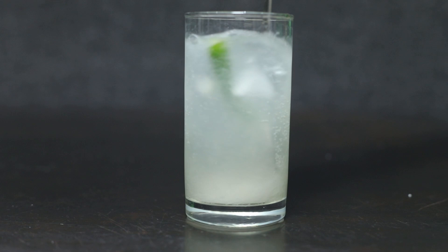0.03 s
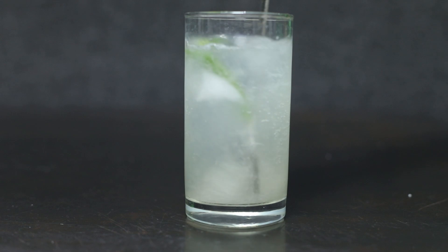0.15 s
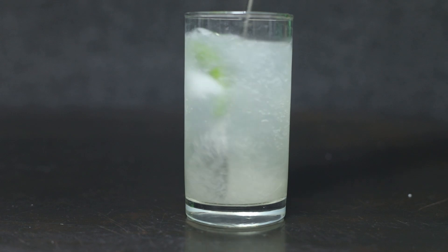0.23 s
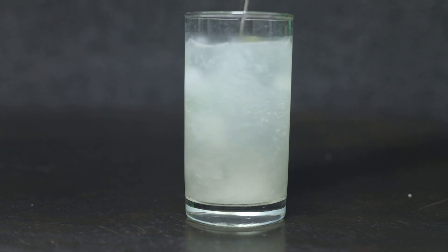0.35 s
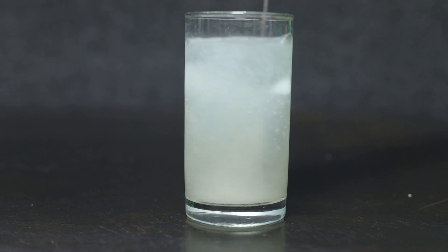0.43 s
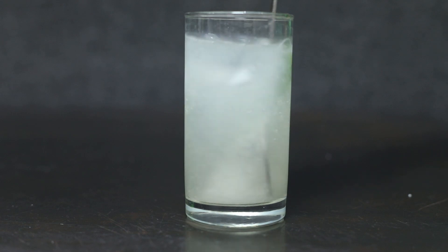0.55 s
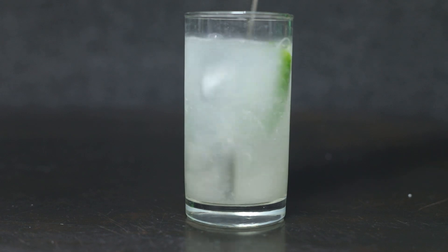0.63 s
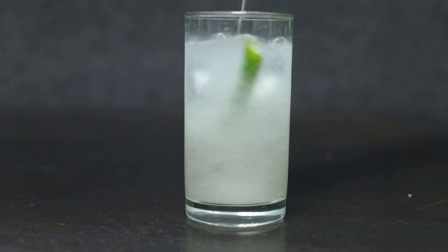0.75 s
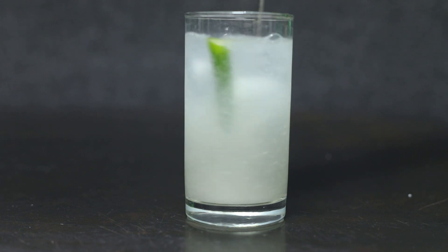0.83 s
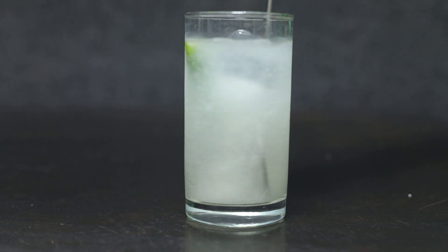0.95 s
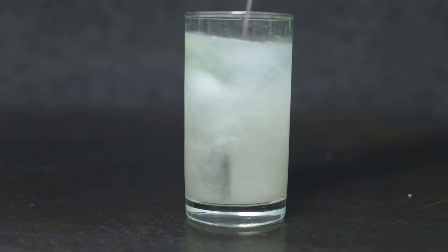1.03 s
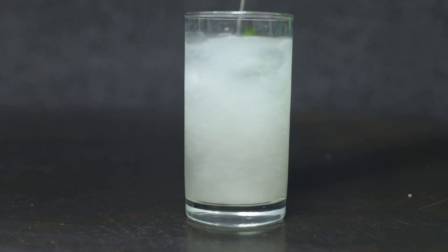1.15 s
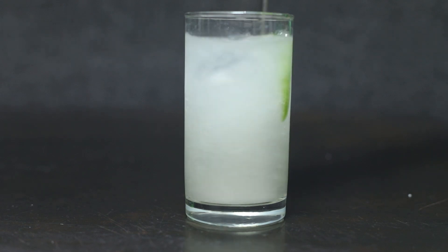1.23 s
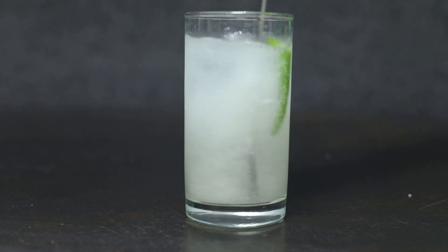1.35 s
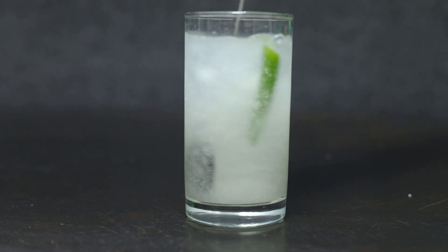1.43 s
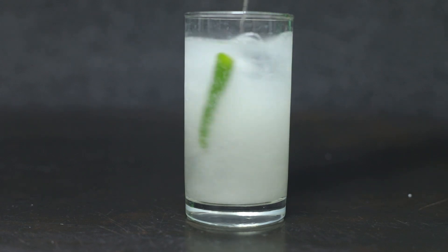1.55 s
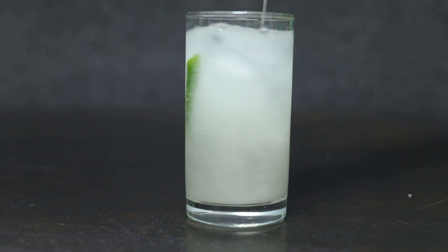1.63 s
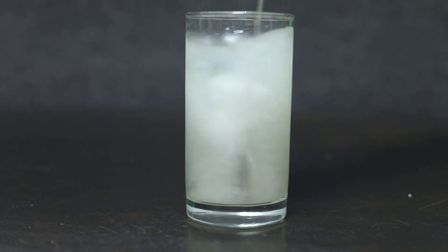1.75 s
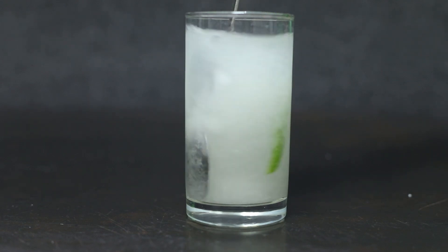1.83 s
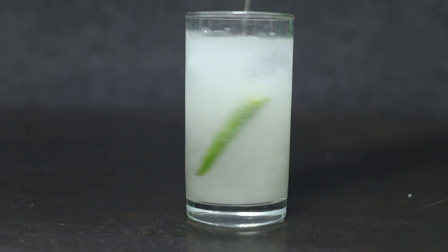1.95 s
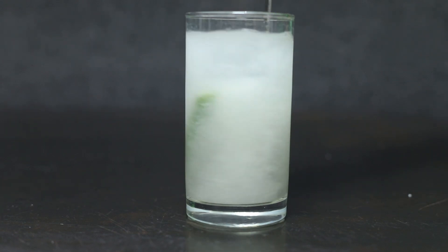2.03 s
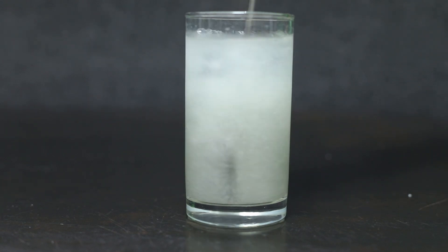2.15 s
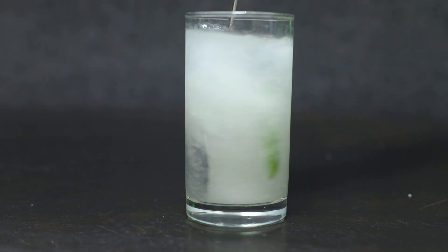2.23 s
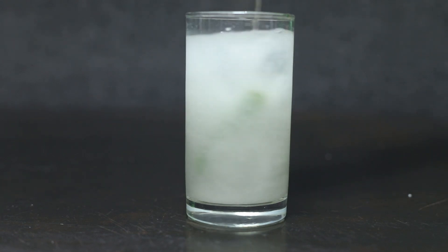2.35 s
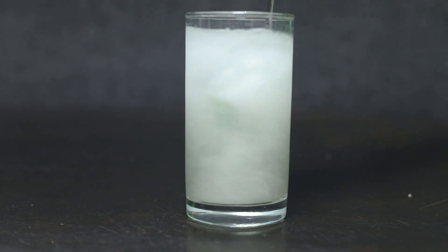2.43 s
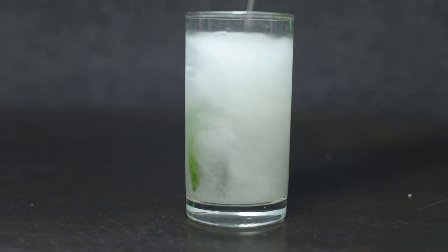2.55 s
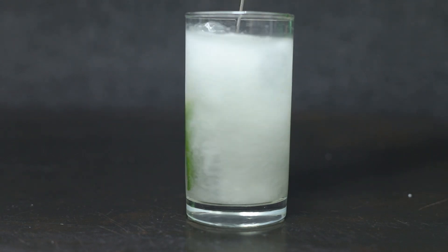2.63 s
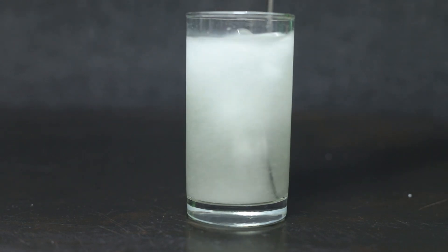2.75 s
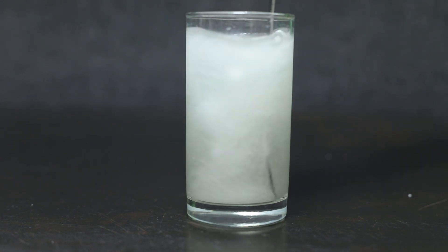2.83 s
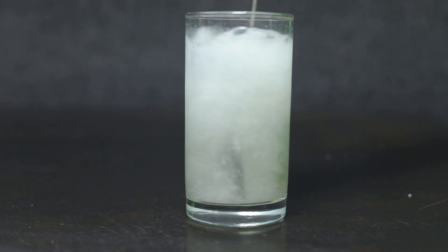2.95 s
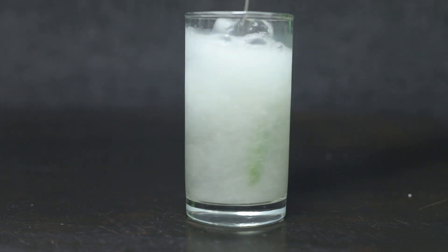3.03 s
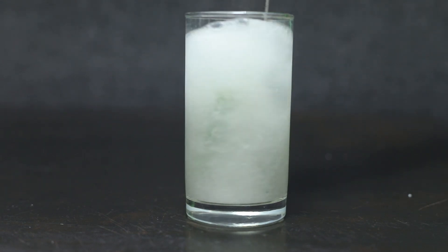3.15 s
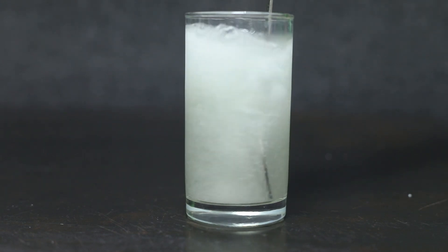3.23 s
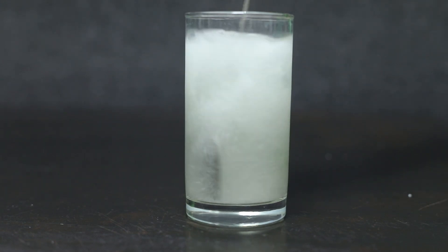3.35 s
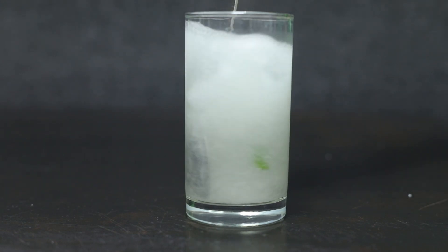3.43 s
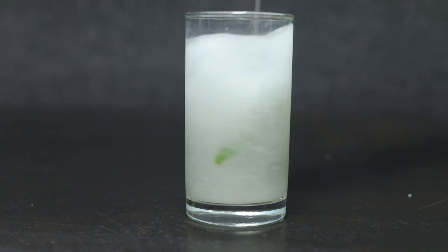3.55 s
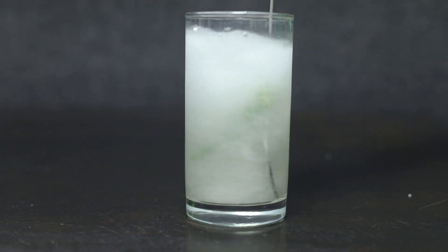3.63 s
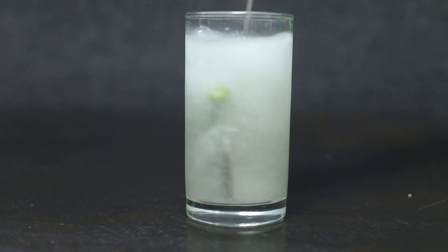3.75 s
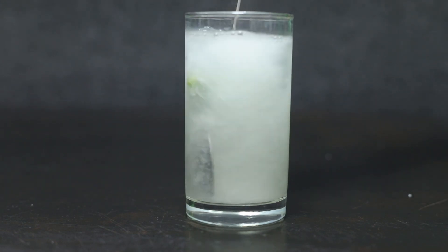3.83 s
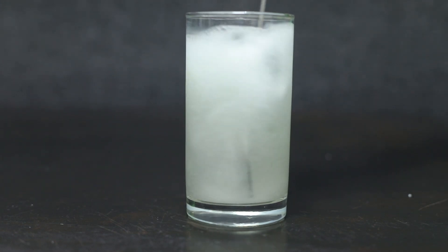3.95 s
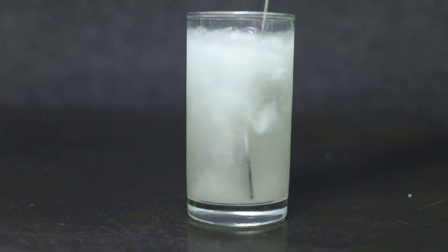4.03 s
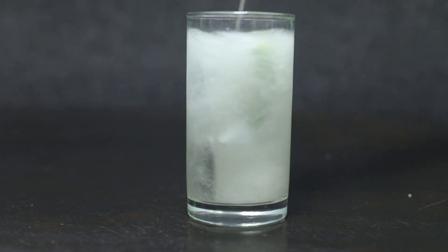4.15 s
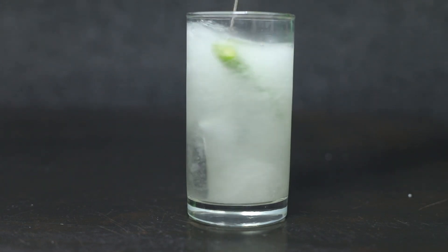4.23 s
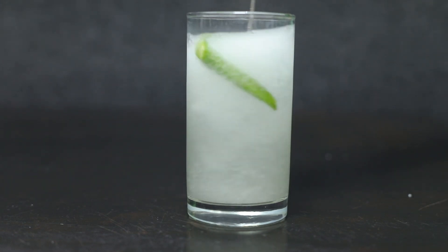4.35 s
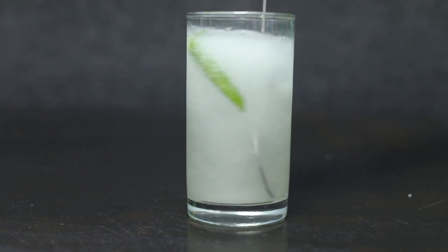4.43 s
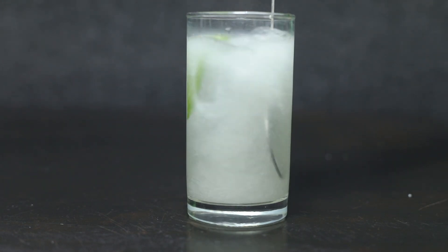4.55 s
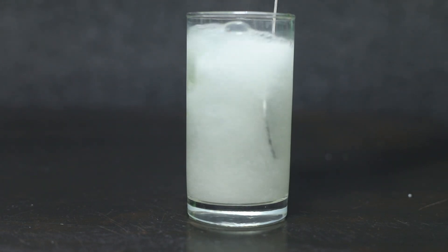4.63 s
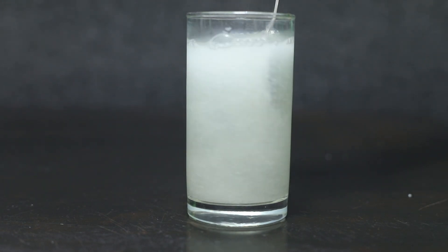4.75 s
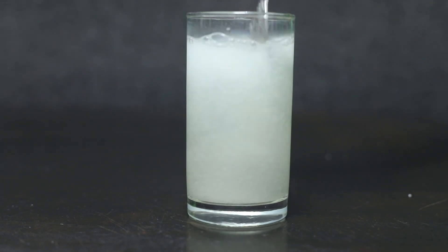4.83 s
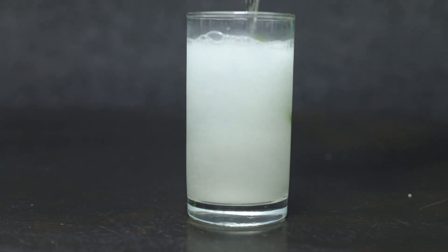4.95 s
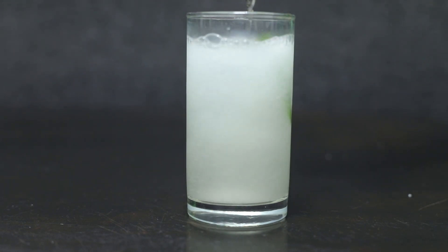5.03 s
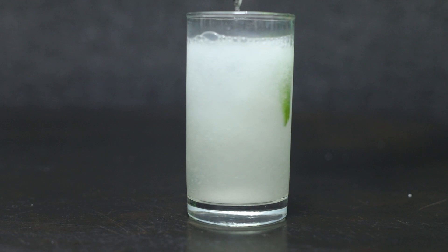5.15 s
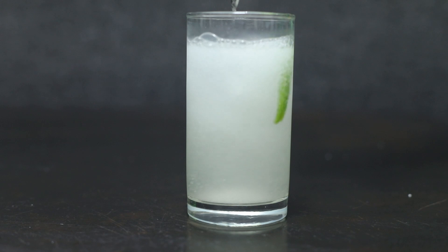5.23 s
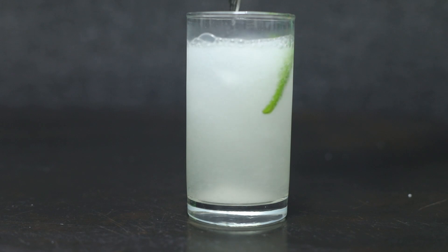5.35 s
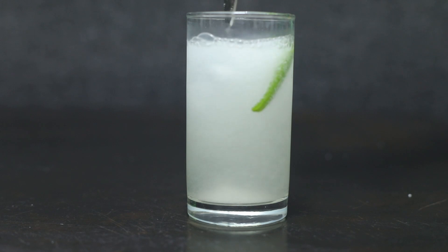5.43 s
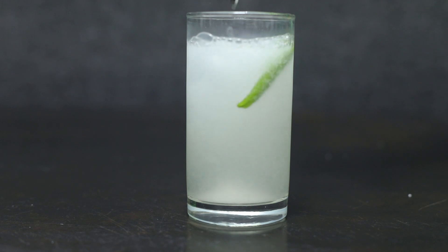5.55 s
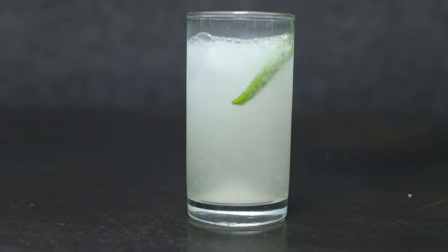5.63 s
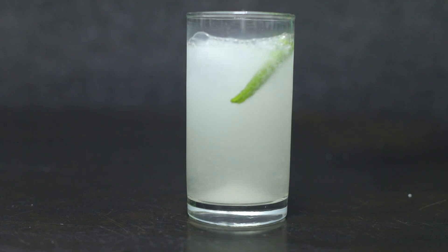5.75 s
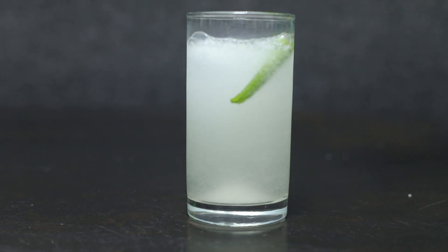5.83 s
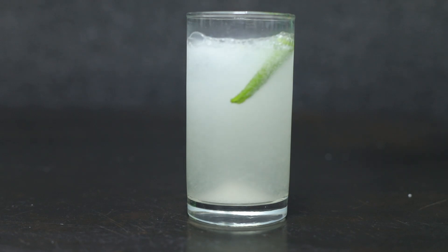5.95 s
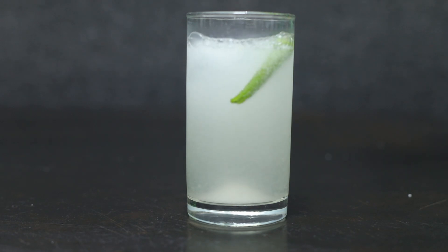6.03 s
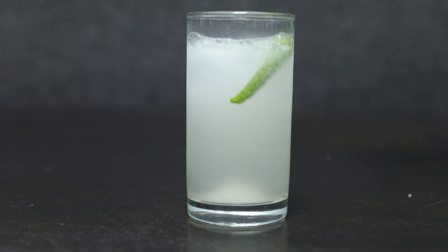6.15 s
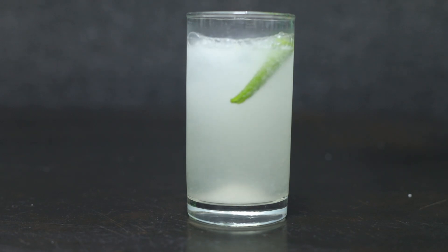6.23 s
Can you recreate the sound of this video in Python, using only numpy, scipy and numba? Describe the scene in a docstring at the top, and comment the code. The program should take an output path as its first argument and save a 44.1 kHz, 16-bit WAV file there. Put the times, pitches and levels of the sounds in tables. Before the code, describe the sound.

A metal spoon stirs ice in a tall full glass, quick irregular dull clinks over watery gulps and soft fizz, then it settles quietly.

```python
"""A metal spoon stirs ice in a tall glass of fizzy drink on a table, in a small quiet room.
Each knock is a short dull clink, since foam damps the glass: brief decaying modes of wall, ice and spoon.
The drink gulps and bubbles round the spoon: swelling, fading sines that climb in pitch.
Fizz hisses at the surface as uneven band-passed noise; an appliance hums far off as wavering sines."""
import sys
import numpy as np
from scipy import signal
from scipy.fft import rfft, irfft
from scipy.io import wavfile
from scipy.ndimage import uniform_filter1d
from numba import njit

SR = 44100
rng = np.random.default_rng(int(sys.argv[2]) if len(sys.argv) > 2 else 0)


def store_pcm(level_fs):
    """Save levels as 16-bit WAV."""
    pcm = np.round(np.clip(level_fs, -1, 1) * 32767).astype(np.int16)
    wavfile.write(sys.argv[1], SR, np.atleast_2d(pcm).T)


N = 277389
T = np.arange(N) / SR

# modes of the glass wall: [f/Hz, relative level/dB, t60/s]
WALL_MODES = [(1910, 3.5, 0.006), (2091, 3.5, 0.009), (2235, 7, 0.005), (2431, 3.5, 0.013), (2530, 2, 0.01),
              (2700, 2.5, 0.008), (3010, -4, 0.005)]
# modes of the ice cubes: [f/Hz, relative level/dB, t60/s]
ICE_MODES = [(900, -11, 0.005), (1147, -1, 0.009), (1340, -2, 0.007), (1510, 2, 0.01), (1716, 1, 0.007),
             (1850, 2, 0.006)]
# motion of the drink and its gas: [t/s, churning drive/dB, fizz level/dB]
DRINK_LEVELS = [(0, -56.5, -66), (.21, -57.5, -74), (.5, -64.5, -70.5), (1.21, -57.5, -72.5),
                (1.5, -55, -71), (1.7, -59, -70.5), (1.94, -59, -68), (2.33, -54, -70), (2.7, -62.5, -68),
                (3.05, -51, -62.5), (3.28, -61, -65), (3.84, -61.5, -65), (4.36, -55.5, -65),
                (4.66, -69.5, -65.5), (5.3, -76, -68.5), (6.29, -73, -69)]


def undb(db):
    """Decibels to gain."""
    return 10 ** (np.asarray(db, float) / 20)


def unit(x):
    """Scale to rms 1."""
    return x / np.sqrt(np.mean(x ** 2))


def band(x, hz, width_hz):
    """Two-pole band-pass."""
    return signal.lfilter(*signal.iirpeak(hz, hz / width_hz, SR), x)


def highpass(x, order, hz):
    """Butterworth high-pass."""
    return signal.sosfilt(signal.butter(order, hz, "high", fs=SR, output="sos"), x)


def walk(rate_hz):
    """Random levels held 1 / rate_hz and slewed twice; rms 1."""
    hold = int(SR / rate_hz)
    steps = np.repeat(rng.standard_normal(N // hold + 1), hold)
    slewed = uniform_filter1d(uniform_filter1d(steps, hold), hold)
    return unit(slewed[:N])


def ring(s, db, modes, scatter_db, detune, rise_s, spot_hz=None):
    """Every blow starts each mode with its own strength, a little off pitch as ice and foam shift."""
    out = np.zeros(N + SR)
    at = (s * SR).astype(int)
    chance = rng.standard_normal((len(s), len(modes), 3, 1))
    for k, (hz, mode_db, t60_s) in enumerate(modes):
        n = np.arange(int(t60_s * SR))
        # modes far from the favoured pitch are barely driven: 24 dB down per octave
        far_db = 0 if spot_hz is None else 24 * np.abs(np.log2(hz / spot_hz))
        gain = undb((db - far_db)[:, None] + mode_db + scatter_db * chance[:, k, 0])
        mode_hz = hz * (1 + detune * chance[:, k, 1])
        phase = 2 * np.pi * mode_hz * n / SR + 1.1 * chance[:, k, 2]
        shape = undb(-60 * n / len(n)) * (1 - np.exp(-n / (rise_s * SR))) ** 2
        np.add.at(out, at[:, None] + n, gain * shape * np.sin(phase))
    return out[:N]


@njit
def bubbles(n, at, step, cycles, glide, size):
    """Each bubble swells and fades (crest at its time) while its pitch climbs; step is rad/sample."""
    out = np.zeros(n)
    for k in range(len(at)):
        tau = cycles * 2 * np.pi / step[k]  # samples from onset to crest
        phase = 0.
        for i in range(int(8 * tau)):
            j = at[k] - int(tau) + i
            phase += step[k] * (1 + glide * (i / tau - 1))
            if 0 <= j < n:
                out[j] += size[k] * i / tau * np.exp(1 - i / tau) * np.sin(phase)
    return out


def bubbles_at(s, hz, cycles, glide, gain):
    """Bubbles given by crest time in s and pitch at the crest in Hz."""
    return bubbles(N, (s * SR).astype(np.int64), 2 * np.pi * hz / SR, cycles, glide, gain)


def swarm(lo_hz, hi_hz, cycles, glide, spread_db, count):
    """A random crowd of bubbles of mixed size; rms 1."""
    when, pitch, size = rng.random((count, 3)).T
    hz = lo_hz * (hi_hz / lo_hz) ** pitch
    return unit(bubbles_at(when * N / SR, hz, cycles, glide, undb(spread_db * size)))


def vessel(x):
    """The full glass colours what moves inside it: resonances added to the direct sound."""
    # resonances of the full glass: [f/Hz, width/Hz, level/dB]
    resonances = [(524, 40, 0), (653, 40, 1), (854, 45, 2), (1101, 40, 6), (1501, 60, 2)]
    x = highpass(x, 3, 300)  # too small for bass
    return x + sum(undb(db) * band(x, hz, width_hz) for hz, width_hz, db in resonances)


def drink():
    """Fizz at the surface, small bubbles in the swirl, a low slosh; the last two surge together."""
    # bands of the fizz: [f/Hz, width of each of two passes/Hz, relative level/dB]
    fizz_bands = [(4160, 1400, 11), (5700, 680, 10), (7300, 1400, 15), (9740, 3100, 15.5),
                  (10400, 3000, 7.5), (10100, 9000, 12.5)]
    s, *columns = np.transpose(DRINK_LEVELS)
    churn_db, fizz_db = (np.interp(T, s, c) for c in columns)

    pop_gain = undb(2.5 * np.minimum(rng.exponential(size=N), 7))  # some samples stand far out
    fizz = 0
    for hz, width_hz, db in fizz_bands:
        hiss = pop_gain * rng.standard_normal(N)
        fizz = fizz + undb(db) * band(band(hiss, hz, width_hz), hz, width_hz)
    fizz_gain = undb(fizz_db + 1.2 * walk(3.77))

    surge = walk(23.08)
    swirl = undb(1.8 * surge) * swarm(650, 3000, cycles=1.5, glide=.03, spread_db=20, count=4000)
    slosh = undb(3 + 5 * surge) * swarm(330, 1500, cycles=1.1, glide=.03, spread_db=16, count=3000)
    churning = vessel(undb(churn_db - 7) * (swirl + slosh))
    return fizz_gain * unit(fizz) + churning


def background():
    """Still air of the room as shaped noise, and a motor hum that wavers a little in pitch and level."""
    # spectrum of the room air: [f/Hz, density/dB per Hz]
    air_spectrum = [(30, -112), (110, -117), (150, -104), (200, -99), (300, -102), (420, -102.5),
                    (900, -100), (1700, -103), (2500, -105), (3300, -114), (5300, -119), (16000, -130)]
    # partials of the hum: [f/Hz, mean rms level/dB]
    hum_partials = [(175, -79), (350, -76), (395, -81), (445, -81), (525, -79.5), (642, -79), (691, -80)]
    hz, density_db = np.transpose(air_spectrum)
    f = np.maximum(np.fft.rfftfreq(N, 1 / SR), 1)
    shape = undb(np.interp(np.log(f), np.log(hz), density_db))
    air = irfft(rfft(rng.standard_normal(N)) * shape, N) * np.sqrt(SR / 2)

    warped_s = np.cumsum(1 + 0.00295 * walk(2.8)) / SR
    hum = 0
    for partial_hz, db in hum_partials:
        gain = np.sqrt(2) * undb(db + 2 * walk(15))
        hum = hum + gain * np.sin(2 * np.pi * partial_hz * warped_s)
    return air + hum


def rattle(count=400):
    """Drifting cubes bump each other and the wall at random, harder while the drink churns."""
    settled_s, top_db, spread_db = 5.1, 4, 12  # last bump; strength against the churning drive
    c = rng.random((count, 3)).T
    s = c[0] * settled_s
    at_s, churn_db = np.transpose(DRINK_LEVELS)[:2]
    wall_db, ice_db = np.interp(s, at_s, churn_db) + top_db - spread_db * c[1:]
    wall = ring(s, wall_db, WALL_MODES, scatter_db=6, detune=0.047, rise_s=0.00052)
    ice = ring(s, ice_db, ICE_MODES, scatter_db=3, detune=0.06, rise_s=0.0004)
    return wall + ice


def knocks():
    """Spoon and ice against the glass and each other; the wall passes each blow to the table top."""
    # knocks: [t/s, wall drive/dB, wall pitch favoured by the struck spot/Hz,
    #          ice drive/dB, spoon stem drive/dB, spoon bowl drive/dB, contact tick drive/dB]
    blows = [(0.0098, -37.5, 2200, -40, -44, -45, -30), (0.018, -32.5, 2100, -28, -36.5, -42, -48),
             (0.038, -32.5, 2230, -34.5, -51, -36, -29), (0.0514, -28.5, 2110, -60, -37, -27.5, -44),
             (0.059, -41, 2430, -41, -53, -34.5, -63), (0.186, -56, 2500, -69, -65, -66, -70),
             (0.225, -67, 2300, -50, -69, -68, -63), (0.2464, -63, 2600, -49, -65, -56, -47),
             (0.3084, -48, 2250, -44, -43, -49, -44), (0.323, -44, 2300, -53, -70, -70, -72),
             (0.331, -46, 2500, -43, -73, -67, -71), (0.346, -46, 2500, -63, -75, -72, -73),
             (0.3597, -31.5, 2270, -30, -42, -42.5, -44), (0.369, -41, 1950, -67, -62, -76, -76),
             (0.437, -38, 1980, -36, -50.5, -68, -72), (0.501, -58, 2490, -67, -60, -62, -62),
             (0.5363, -34.5, 2130, -34, -44, -49, -57), (0.6404, -37, 2450, -38, -46, -46, -47),
             (0.6629, -41.5, 2040, -27.5, -43, -36, -43), (0.667, -35.5, 2370, -52, -42, -56, -74),
             (0.721, -38, 2620, -44, -67, -55, -71), (0.7408, -30, 1990, -33, -35, -39, -32),
             (0.7886, -36, 2290, -31, -46, -42, -34), (0.831, -46.5, 2440, -36, -53, -56, -49),
             (0.856, -44, 2030, -49, -53, -66, -45), (0.894, -51, 2290, -49, -49, -64, -57),
             (0.964, -45, 2290, -37.5, -39.5, -61, -66), (0.9718, -40, 2620, -51, -56, -42.5, -42.5),
             (0.989, -41, 2650, -38.5, -51, -69, -86), (1.06, -38, 2180, -31, -45, -36, -35.5),
             (1.064, -50, 2330, -33, -49, -66, -71), (1.075, -58, 2460, -34.5, -65, -54, -65),
             (1.1366, -39, 2260, -41, -47, -47, -49), (1.15, -45, 2430, -40, -41, -67, -49),
             (1.163, -36, 2270, -29.5, -36.5, -32.5, -33.5), (1.176, -35.5, 2520, -43, -45, -51, -42),
             (1.186, -40, 2450, -43, -62, -59, -48), (1.2523, -68, 2410, -39, -56, -65, -56),
             (1.301, -48.5, 2400, -57, -48, -69, -74), (1.344, -62, 2360, -52, -57, -70, -72),
             (1.3841, -70, 2400, -44, -64, -74, -74), (1.4278, -46, 2540, -39, -54, -53, -47),
             (1.438, -47.5, 2430, -53, -69, -75, -81), (1.4546, -42.5, 2430, -34, -44, -69, -37),
             (1.534, -31.5, 2370, -40, -33, -37, -32), (1.5512, -38, 2740, -51, -46, -39.5, -41),
             (1.585, -45, 2570, -47, -68, -68, -64), (1.6133, -25, 3100, -37.5, -32.5, -35, -26.5),
             (1.6284, -38, 2430, -44, -27.5, -28, -25), (1.6419, -30.5, 1990, -39, -36, -58, -76),
             (1.7329, -33, 2480, -40, -37.5, -44.5, -37.5), (1.8215, -55, 2280, -44, -55, -43, -37),
             (1.8353, -37, 2300, -36, -49, -53, -44), (1.8911, -38.5, 2560, -34, -39, -39, -38.5),
             (1.8997, -42.5, 2600, -42, -40.5, -39.5, -49), (1.9902, -65, 2300, -44, -52, -51, -70),
             (2.054, -70, 2010, -40, -80, -85, -73), (2.0916, -34.5, 1860, -52, -37.5, -35.5, -43),
             (2.1134, -55, 2900, -64, -54, -59, -48), (2.137, -40.5, 2340, -70, -66, -62, -68),
             (2.154, -46, 2200, -60, -70, -70, -72), (2.194, -55, 2130, -68, -72, -57, -51),
             (2.2057, -37.5, 2170, -56, -51, -55, -44), (2.209, -36.5, 2270, -30.5, -36.5, -37.5, -37.5),
             (2.246, -50, 2360, -48, -71, -60, -67), (2.2753, -29, 2230, -32.5, -31.5, -34.5, -26),
             (2.32, -45, 2510, -63, -76, -65, -52), (2.356, -48, 2800, -60, -64, -56, -64),
             (2.385, -45, 2070, -45.5, -74, -77, -66), (2.407, -44, 2110, -42, -57, -45.5, -47),
             (2.418, -36, 2530, -33, -35, -44, -34), (2.427, -37, 2170, -47, -37.5, -37.5, -36),
             (2.498, -43, 2400, -35.5, -47, -71, -44), (2.5576, -39.5, 2660, -59, -51, -59, -66),
             (2.6081, -41, 2530, -46, -58, -72, -73), (2.646, -45, 2300, -46, -54, -59, -50),
             (2.72, -32.5, 2230, -40, -34, -35.5, -51), (2.73, -24, 2240, -27.5, -26, -34, -22.5),
             (2.806, -38, 2380, -34, -35, -39.5, -39), (2.8587, -52, 2430, -34, -63, -68, -71),
             (2.8698, -31, 2000, -30, -48, -63, -74), (2.881, -40, 2380, -66, -36.5, -44, -40),
             (2.9287, -47, 2140, -58, -63, -49, -43), (2.9504, -39, 2150, -49, -52, -70, -70),
             (2.9594, -25, 2300, -51, -33.5, -38, -25), (2.9765, -23.5, 2130, -30, -24.5, -25.5, -23.5),
             (2.9804, -28, 2190, -62, -30, -48, -44), (2.9887, -54, 2160, -39, -47, -33.5, -51),
             (3.004, -47, 2300, -45, -54, -56, -58), (3.031, -42, 2200, -56, -45, -56, -60),
             (3.0594, -37, 2410, -55, -49, -38, -70), (3.066, -36, 2570, -40, -50, -49, -44),
             (3.0812, -33, 2500, -57, -40, -43.5, -35), (3.085, -36, 2340, -50, -35, -47, -53),
             (3.0972, -28, 2350, -26.5, -34, -27.5, -20), (3.129, -32, 2700, -60, -29, -34, -37),
             (3.1383, -35.5, 2520, -48, -54, -41, -36), (3.1738, -29.5, 2500, -61, -40, -59, -66),
             (3.194, -40.5, 2320, -36, -45, -58, -62), (3.2171, -45, 2470, -69, -44, -49, -48),
             (3.3209, -39.5, 2350, -36, -49, -72, -65), (3.3383, -33, 2140, -34, -43, -35, -44),
             (3.3457, -47, 2220, -35, -57, -41, -65), (3.4687, -29.5, 2150, -40, -39.5, -34, -32),
             (3.6124, -35, 2090, -35.5, -37, -34.5, -55), (3.71, -51, 2380, -47, -58, -75, -67),
             (3.782, -61, 2390, -41, -68, -70, -64), (3.7974, -36, 2200, -32, -39, -39, -34.5),
             (3.804, -37.5, 2270, -44, -50, -43, -48), (3.807, -42, 2460, -33, -67, -63, -44),
             (3.8646, -38, 2300, -36, -27, -32, -37), (3.879, -21, 2370, -34, -27, -30.5, -26),
             (3.8868, -30.5, 2450, -59, -56, -52, -49), (3.9, -37, 2460, -68, -47, -57, -41),
             (3.918, -46, 2500, -64, -56, -65, -60), (3.929, -48, 2550, -63, -60, -63, -60),
             (3.9631, -36, 2160, -37, -48, -40.5, -42), (4.039, -43.5, 2240, -43, -60, -49, -44),
             (4.1347, -52, 2340, -36.5, -51, -67, -55), (4.2042, -43.5, 2100, -41, -53, -47, -45),
             (4.2484, -29, 2700, -37, -30, -29.5, -24), (4.293, -44, 2520, -49, -42, -50, -42),
             (4.312, -42, 2400, -37, -60, -48, -49), (4.3608, -40, 2460, -41, -36, -56, -62),
             (4.37, -35, 2660, -57, -46, -44.5, -46), (4.51, -45, 2680, -66, -43, -49, -53),
             (4.5331, -32, 2230, -34, -70, -34, -33), (4.646, -31.5, 1900, -52, -45.5, -67, -65),
             (4.764, -47.5, 2070, -52, -59, -63, -69), (4.789, -49, 2360, -59, -49, -54, -64),
             (4.8225, -35.5, 2220, -58, -37.5, -47, -46), (4.842, -49, 2500, -66, -72, -72, -68),
             (4.9013, -54, 1900, -43.5, -76, -59, -72), (5.018, -61, 2300, -43, -71, -74, -67),
             (5.0652, -52, 2270, -44, -63, -71, -79), (5.0791, -43, 2340, -42, -56, -71, -74),
             (5.157, -70, 2030, -52, -76, -76, -76), (5.203, -60, 2400, -58, -74, -76, -76),
             (5.2213, -37, 2160, -37, -40, -44, -49), (5.478, -47, 1890, -49, -69, -81, -68),
             (5.539, -60.5, 2500, -77, -75, -78, -78)]
    # modes of spoon stem, spoon bowl, contact tick and table top: [f/Hz, relative level/dB, t60/s]
    stem_modes = [(3700, 2, 0.0045), (4200, 3.5, 0.0055), (4550, 0, 0.0045)]
    bowl_modes = [(6350, 1, 0.0045), (6950, 5, 0.005), (7600, 4, 0.0045)]
    tick_modes = [(8100, 7, 0.00058), (10060, 12, 0.0015), (12100, -3, 0.0032), (14400, -6, 0.0038)]
    table_modes = [(168.2, -28.5, 0.058), (243, -31.5, 0.053), (349.3, -39, 0.37)]

    # each knock chatters once more, soon and weaker
    soonest_s, latest_s, rebound_db, rebound_spread_db = 0.0028, 0.01, -16, 5
    first = np.array(blows, float)
    c = rng.random((len(first), 6))
    again = first.copy()
    again[:, 0] += soonest_s + (latest_s - soonest_s) * c[:, 0]
    again[:, [1, 3, 4, 5, 6]] += rebound_db + rebound_spread_db * (2 * c[:, 1:] - 1)
    s, wall_db, spot_hz, ice_db, stem_db, bowl_db, tick_db = np.concatenate([first, again]).T

    hits = ring(s, wall_db, WALL_MODES, scatter_db=1, detune=0.034, rise_s=0.00021, spot_hz=spot_hz)
    hits = hits + ring(s, ice_db, ICE_MODES, scatter_db=2, detune=0.05, rise_s=0.00038)
    for db, modes in (stem_db, stem_modes), (bowl_db, bowl_modes), (tick_db, tick_modes):
        hits = hits + ring(s, db, modes, scatter_db=2, detune=0.04, rise_s=0.00014)
    clinks = highpass(hits + rattle(), 3, 600)  # cubes and spoon are too small to push out low notes

    delay_s = 0.00466
    thuds = ring(s + delay_s, wall_db, table_modes, scatter_db=2.5, detune=0.0637, rise_s=0.0079)
    return clinks + thuds


def gulps(count=7):
    """Each air pocket closing behind the spoon gives one large bubble and a choppy spray of smaller ones."""
    # large air pockets: [t of the crest/s, level/dB, f/Hz]
    pockets = [(0.097, -42.5, 534), (0.127, -63, 560), (.201, -53, 610), (.479, -53.5, 600),
               (0.539, -41, 530), (0.653, -45, 565), (0.752, -49.5, 525), (0.837, -48, 510),
               (.968, -48, 617), (1.002, -49, 550), (1.188, -48.5, 566), (1.263, -47.5, 515),
               (1.407, -43.5, 558), (1.481, -49.5, 444), (1.641, -45, 570), (1.727, -46.5, 570),
               (1.905, -41.5, 440), (1.997, -41, 595), (2.061, -39.5, 523), (2.218, -39, 543),
               (2.291, -54, 686), (2.406, -53, 520), (2.849, -43.5, 475), (3.014, -37.5, 550),
               (3.108, -42.5, 353), (3.204, -46, 503), (3.489, -48.5, 435), (3.666, -43, 555),
               (3.728, -45, 530), (3.796, -38, 597), (3.822, -44, 636), (4.0, -44, 450), (4.134, -45, 372),
               (4.351, -52, 556), (4.426, -49.5, 530), (4.544, -52.5, 540)]
    small_db, small_spread_db = -6.5, 8  # small bubbles against the large one
    s, db, hz = np.transpose(pockets)
    c = rng.random((len(s), count, 3))
    spray_s = s[:, None] + 0.07 * (c[..., 0] - .4)
    spray_hz = hz[:, None] * .85 * 3 ** c[..., 1]
    spray_db = db[:, None] + small_db - small_spread_db * c[..., 2]
    large = bubbles_at(s, hz, 1.3, .03, undb(db))
    spray = bubbles_at(spray_s.ravel(), spray_hz.ravel(), .8, .05, undb(spray_db.ravel()))
    return large + vessel(spray)


def echo():
    """One diffuse echo: bands of noise that swell in at once and die away."""
    # decay of the room: [f/Hz, t60/s, relative level/dB]
    decays = [(219.6, 0.85, -24.5), (460, 0.51, -21), (1057, 0.21, -19), (1580, 0.37, -22.5),
              (2640, 0.39, -23.5), (3870, 0.34, -19.5), (6800, 0.39, -16), (9600, 0.023, -12)]
    t = np.arange(SR // 2) / SR
    tail = 0
    for hz, t60_s, db in decays:
        part = band(band(rng.standard_normal(len(t)), hz, 0.5 * hz), hz, 0.5 * hz)
        part = part * undb(-60 * t / t60_s) * (1 - np.exp(-t / 0.00054))
        early_rms = np.sqrt(np.mean(part[:SR // 10] ** 2))
        tail = tail + undb(db) * part / (early_rms * np.sqrt(hz))
    return tail


def room(x, count=5):
    """The spoon circles, so the sound leaves from a spot that turns and each spot has its own echo."""
    spot = T * 12 % count  # 12 spots per s
    out = 0
    for k in range(count):
        away = np.abs((spot - k + count / 2) % count - count / 2)
        share = np.cos(np.pi / 2 * np.minimum(away, 1))
        out = out + signal.oaconvolve(x * share, echo())[:N]
    return out


def scene():
    """The glass and its drink, the echo of knocks and gulps, and the room."""
    hits = highpass(knocks(), 6, 135)  # the table top gives no deep bass
    air_pockets = gulps()
    echoes = room(hits + undb(-8) * air_pockets)
    return (hits + air_pockets + echoes + drink() + background())[None]


def record(dry):
    """The microphone drops the deep bass and softens the top octave; the top is cut steeply."""
    top_hz = 16400
    thin = signal.sosfilt(signal.butter(2, [35, 14000], "band", fs=SR, output="sos"), dry)
    return signal.sosfilt(signal.ellip(10, .2, 70, top_hz, fs=SR, output="sos"), thin)


dry = scene()
out = record(dry)
store_pcm(out)
```